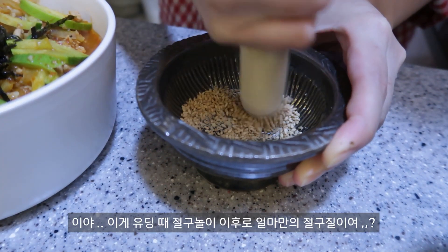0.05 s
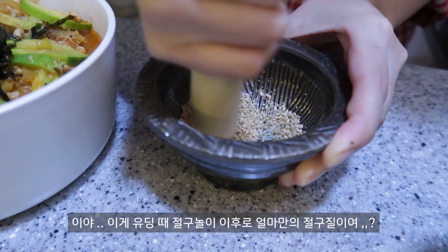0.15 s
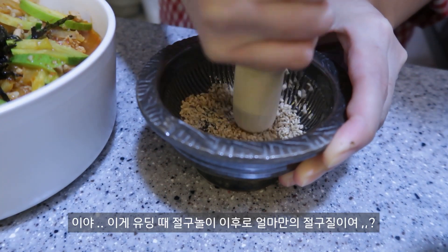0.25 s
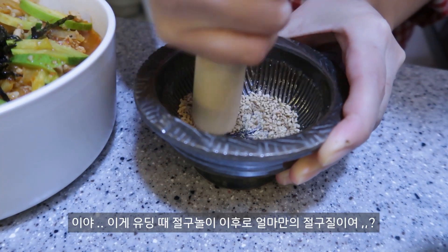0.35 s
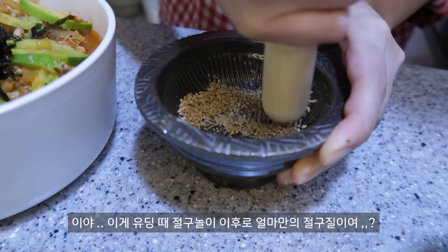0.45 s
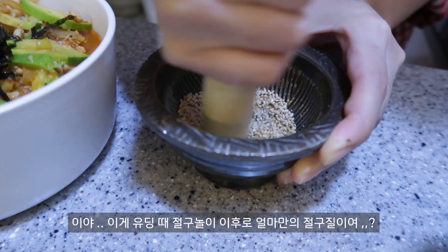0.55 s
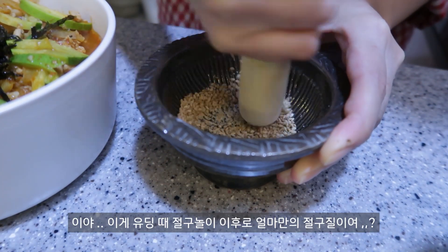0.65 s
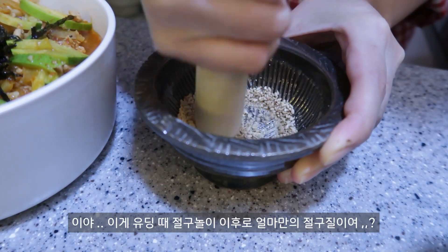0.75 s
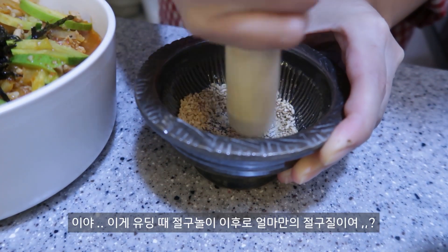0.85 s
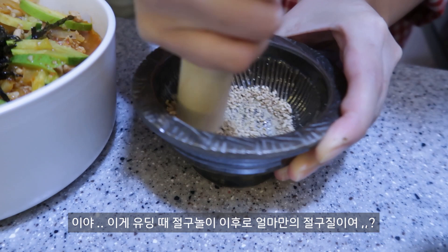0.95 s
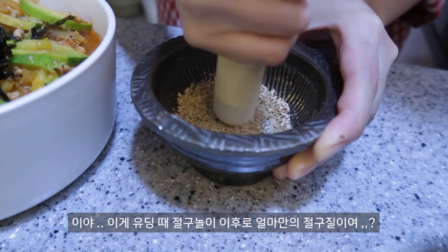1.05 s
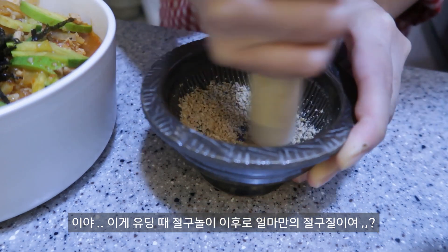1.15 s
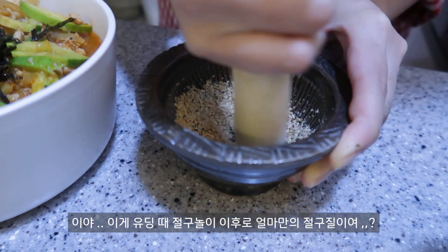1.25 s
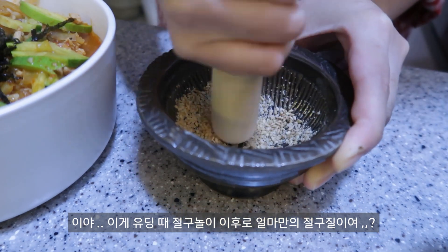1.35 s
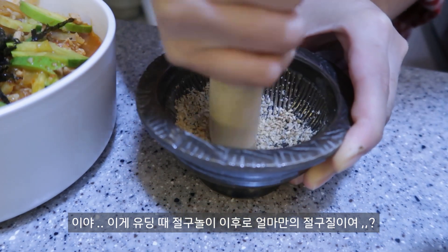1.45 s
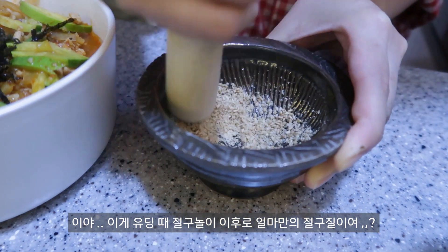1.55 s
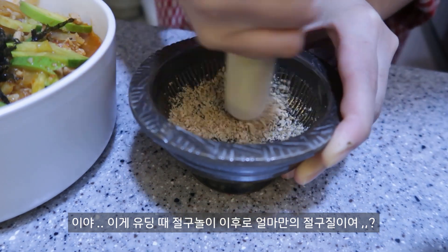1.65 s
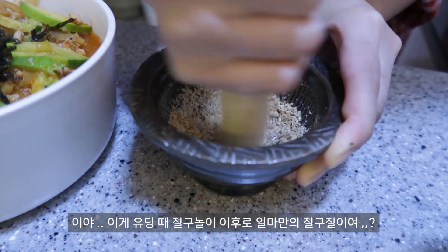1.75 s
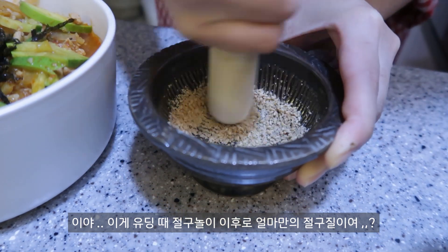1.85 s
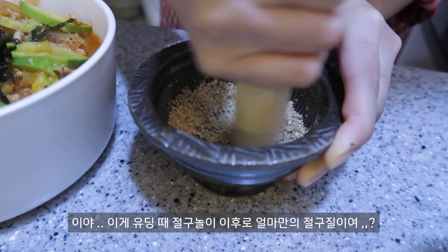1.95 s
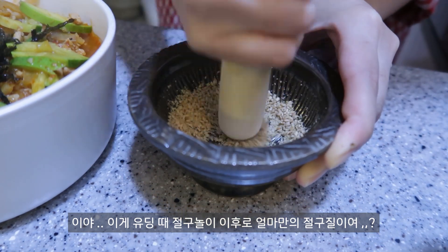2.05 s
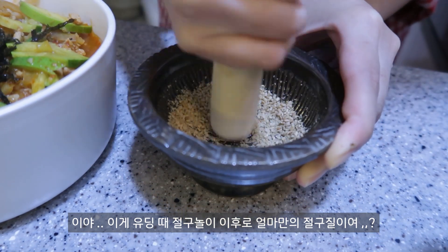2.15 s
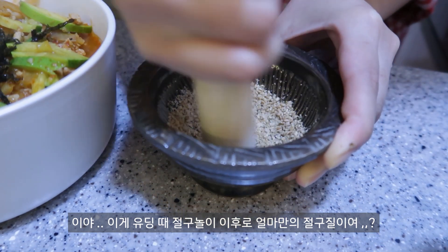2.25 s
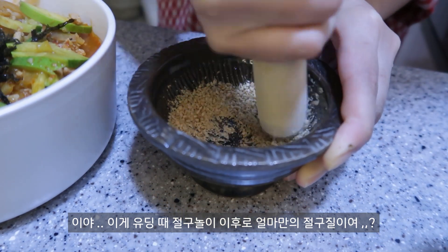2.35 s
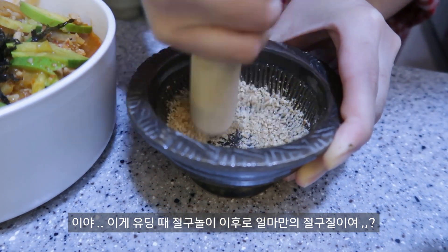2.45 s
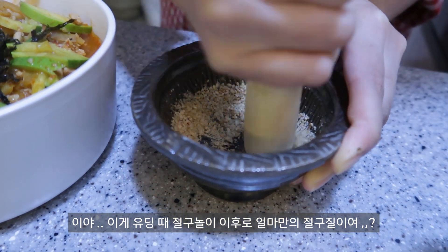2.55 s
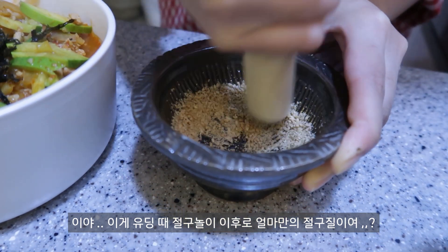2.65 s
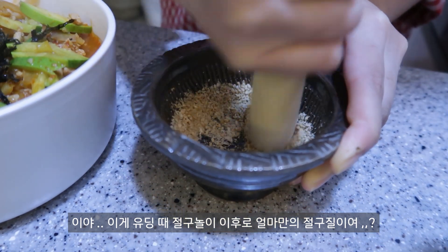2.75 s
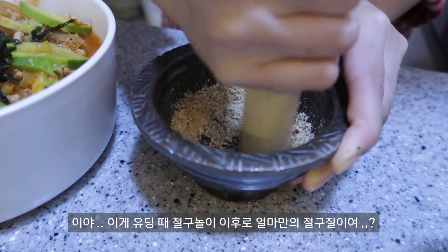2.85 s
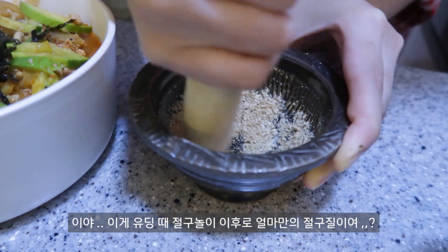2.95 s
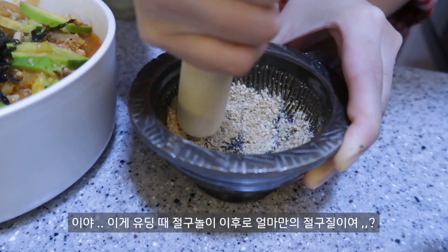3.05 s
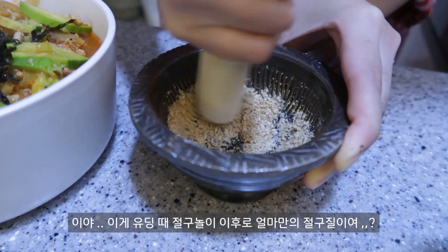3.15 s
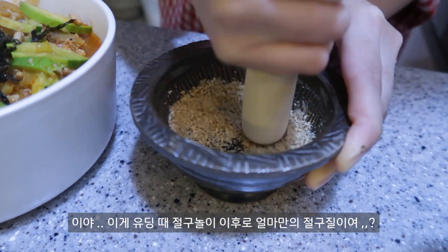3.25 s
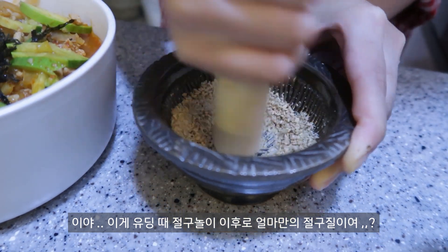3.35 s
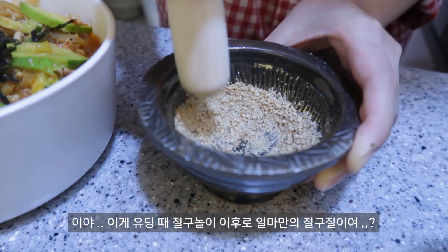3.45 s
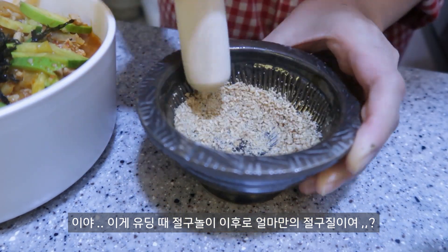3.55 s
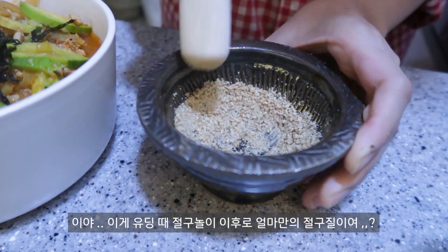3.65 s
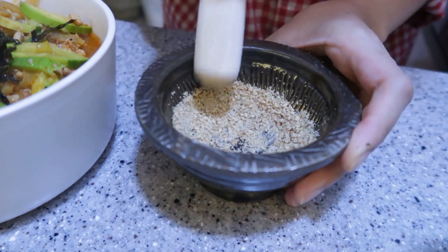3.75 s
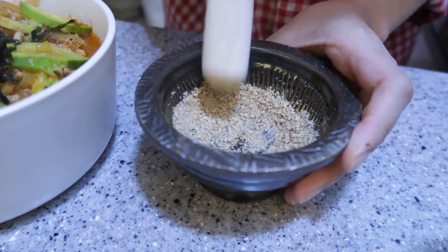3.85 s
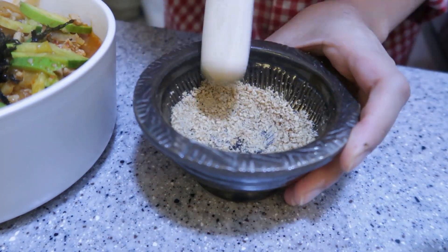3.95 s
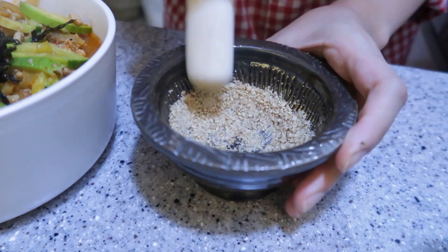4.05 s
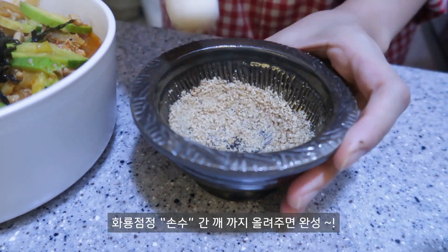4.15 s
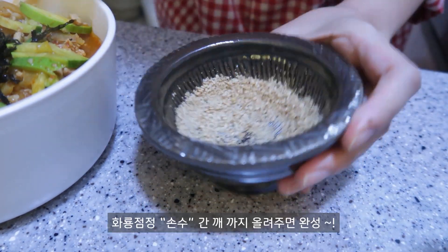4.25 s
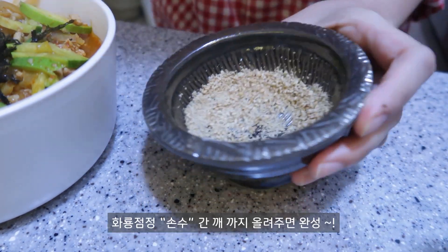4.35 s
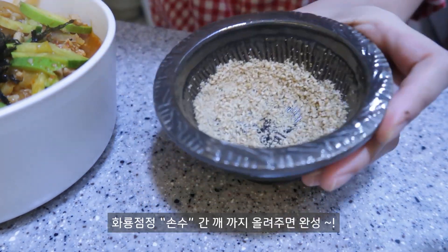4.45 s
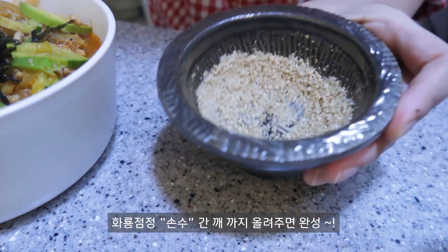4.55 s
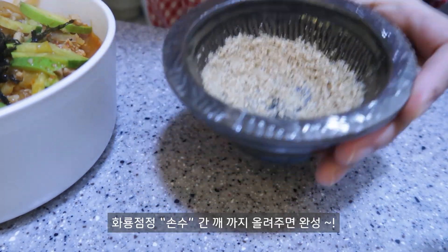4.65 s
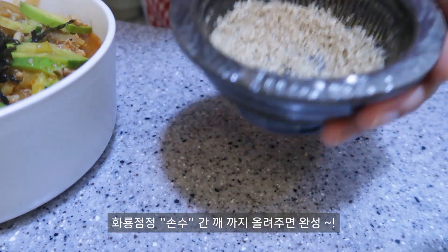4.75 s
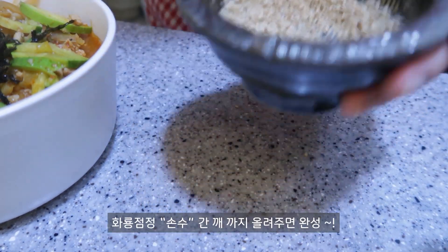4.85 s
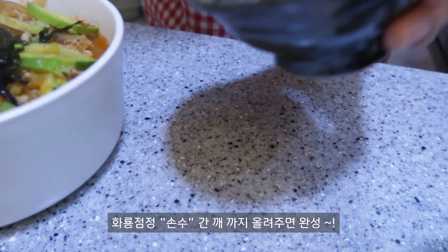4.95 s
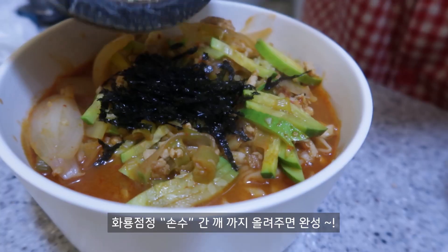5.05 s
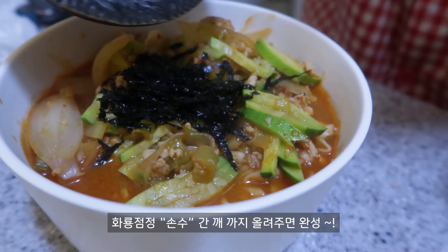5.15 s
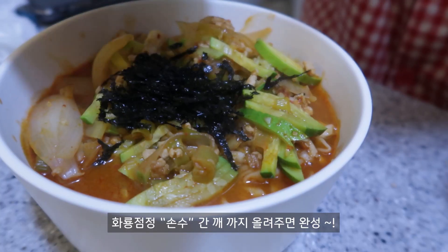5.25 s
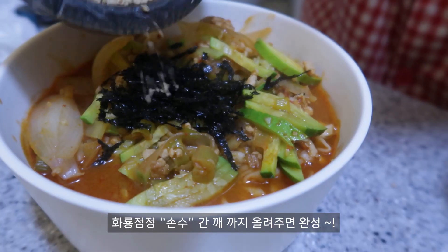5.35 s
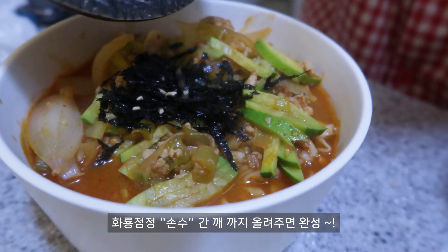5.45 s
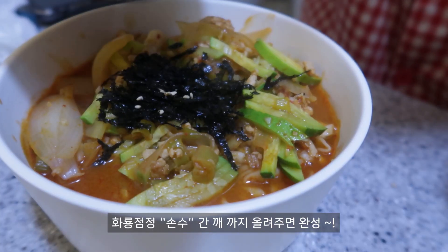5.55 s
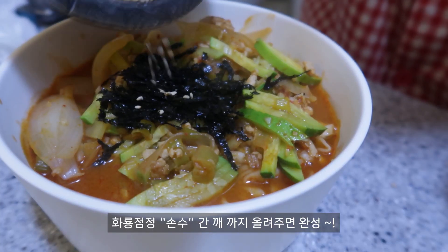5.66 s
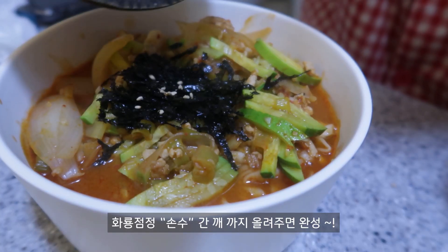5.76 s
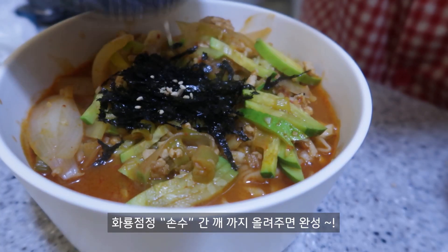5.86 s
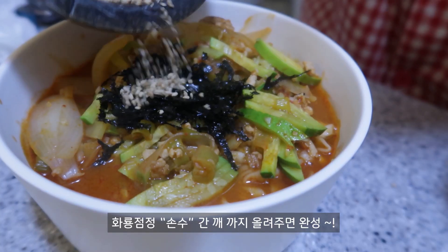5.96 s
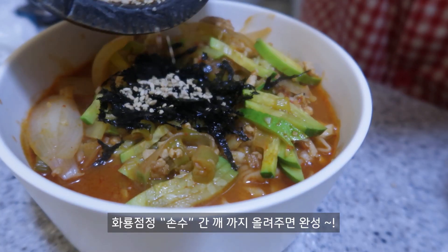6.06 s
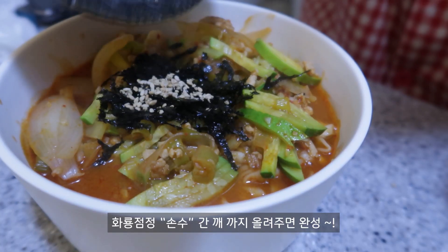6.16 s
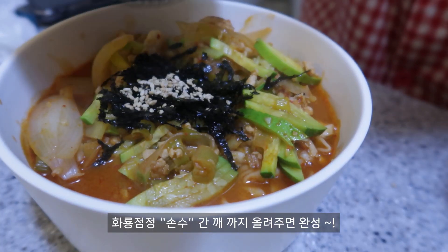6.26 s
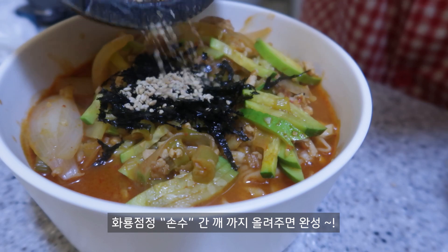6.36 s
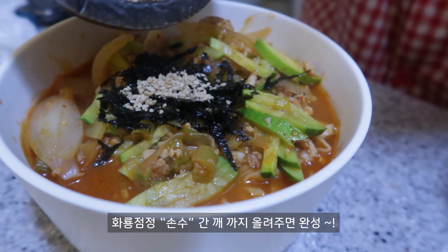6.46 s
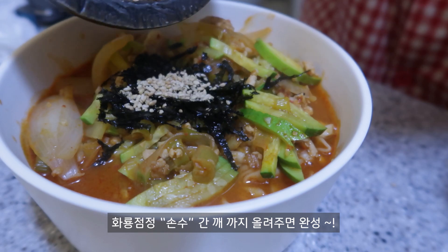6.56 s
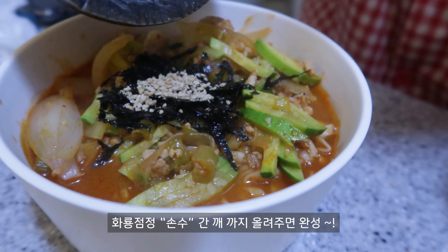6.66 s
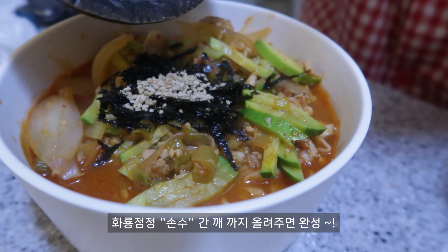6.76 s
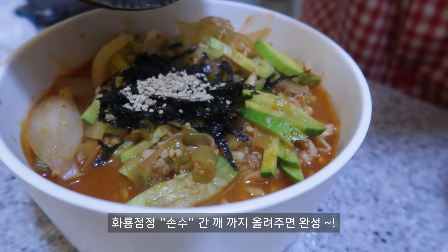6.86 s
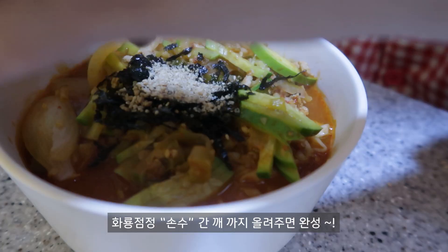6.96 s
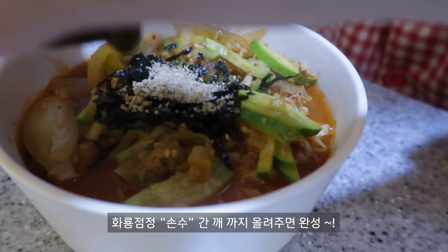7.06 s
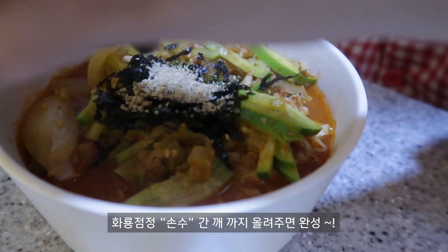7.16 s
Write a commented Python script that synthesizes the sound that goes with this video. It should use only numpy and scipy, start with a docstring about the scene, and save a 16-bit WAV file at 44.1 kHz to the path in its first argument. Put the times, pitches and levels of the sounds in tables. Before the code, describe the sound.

A wooden pestle grinds sesame seeds in a ribbed ceramic mortar, scratchy and crunching, then taps the rim four times before soft pouring and a clink.

```python
"""A quiet kitchen, a stone counter close to the camera's two microphones: a wooden pestle grinds seeds in a ribbed
ceramic mortar. It scrapes, knocks on the ribs and cracks seeds, then taps the rim four times. The mortar is lifted
and shaken over a bowl, and clinks. The kitchen hums behind, louder in the second half; the camera ticks faintly.
Contacts are noise bursts and grains through resonances, rings are decaying sines, the kitchen is noise and tones."""
import sys
import numpy as np
from scipy import signal
from scipy.fft import rfft, irfft, next_fast_len
from scipy.io import wavfile
from scipy.ndimage import map_coordinates

SR = 44100
rng = np.random.default_rng(int(sys.argv[2]) if len(sys.argv) > 2 else 0)


def output_pcm(signal):
    """Save a mono or channel-first signal as 16-bit PCM at the path in sys.argv[1].

    Samples are clipped to [-1, 1] before scaling.
    """
    pcm = np.clip(np.atleast_2d(signal).T, -1, 1) * 32767
    wavfile.write(sys.argv[1], SR, np.round(pcm).astype(np.int16))


N = 318401
TIME = np.arange(N) / SR  # s
LATER_S = 2.78  # from here on the grinding sounds duller
LATER = TIME > LATER_S


def amp(db):
    """Gain of a level in dB."""
    return 10 ** (np.asarray(db) / 20)


def unit(x):
    """x scaled to rms 1."""
    return x / np.sqrt(np.mean(x ** 2) + 1e-20)


def along(points, hz):
    """(Hz, value) points read on a log frequency axis."""
    f, v = np.transpose(points)
    return np.interp(np.log(hz + 1), np.log(f + 1), v)


def curves(rows, outside=None):
    """One value per sample for each column after the time."""
    s, *columns = np.transpose(rows)
    return [np.interp(TIME, s, column, outside, outside) for column in columns]


def wobble(rate):
    """A smooth random curve, rate knots a second."""
    knots = rng.standard_normal(int(N * rate / SR) + 4)
    return map_coordinates(knots, [np.arange(N) * rate / SR])


def filtered(x, response):
    """x times a complex response of frequency, scaled so that white noise keeps its level."""
    m = next_fast_len(N + SR // 2)
    h = response(np.fft.rfftfreq(m, 1 / SR))
    h = unit(np.abs(h)) * np.exp(1j * np.angle(h))
    return irfft(rfft(x, m) * h, m)[..., :N]


def resonant(x, modes, steep_hz):
    """x rings in a body of (Hz, width Hz, dB) modes; above steep_hz the body falls off faster."""
    def body(f):
        total = 0
        for k, (center, width, db) in enumerate(modes):
            mode = 1j * f * width / (center * center - f * f + 1j * f * width)
            total = total + (-1) ** k * amp(db) * mode  # neighbours alternate in sign
        return total / (1 + 1j * f / steep_hz) ** 2
    return filtered(x, body)


def twice(x, modes, steep_hz):
    """A heavy body passes little outside its resonance; rms 1."""
    return unit(resonant(resonant(x, modes, steep_hz), modes, steep_hz))


def coloured(x, spectrum):
    """x shaped by a spectrum of (Hz, dB) points."""
    return filtered(x, lambda hz: amp(along(spectrum, hz)))


BIGGEST = 2  # no grain outgrows the mean by more than this many spreads


def grains(rate, spread_db, smooth):
    """Scattered tiny impacts (rate per second) of uneven size on a smooth rub, rms 1."""
    size = amp(spread_db * np.minimum(rng.exponential(size=N), BIGGEST))
    impacts = (rng.random(N) < rate / SR) * size * rng.standard_normal(N)
    return unit(unit(impacts) + smooth * rng.standard_normal(N))


def bursts(times, db, length, blow):
    """Pushes that start at once: one sharp blow ahead of noise that falls 60 dB in its length."""
    out, t = np.zeros(N + SR), np.arange(SR // 10) / SR
    for s, level, t60, first in np.broadcast(times, db, length, blow):
        fade = amp(-60 * t / max(t60, .001))
        noise = fade * rng.standard_normal(len(t))
        noise *= np.linalg.norm(fade) / np.linalg.norm(noise)
        noise[0] = first
        out[round(s * SR):][:len(t)] += amp(level) * noise
    return out[:N]


def sides(db):
    """Gains for a left-right difference."""
    return amp(np.array([db, -db]) / 2)


def ringing(times, db, pan, modes, scatter_db=1.0, flutter_db=0, drift=0):
    """Each blow rings (Hz, dB, t60 s) modes at new strengths, fluttering, a little out of step between microphones."""
    out, t = np.zeros((2, N + SR)), np.arange(SR // 2) / SR
    onset = 1 - np.exp(-(t / 0.0005) ** 2)

    def slow():
        return np.interp(t, np.arange(40) / 70, rng.standard_normal(40))

    for s, level, side in zip(times, db, pan):
        lead = (12.0 + 3.2 * side) * np.array([[1e-6], [-1e-6]])  # s
        ring = 0
        for hz, mode_db, t60 in modes:
            strength = level + mode_db + rng.normal(0, abs(scatter_db))
            gain = amp(strength + flutter_db * slow() - 60 * t / t60)
            phase = 2 * np.pi * hz * (t + lead) + drift * slow() * np.minimum(t / .01, 1)
            ring = ring + gain * np.sin(phase)
        out[:, round(s * SR):][:, :len(t)] += sides(side)[:, None] * ring * onset
    return out[:, :N]


def ports(x, pan, lead):
    """The two microphones hear a near source at slightly different level and phase."""
    m = next_fast_len(N + SR // 2)
    hz, half = np.fft.rfftfreq(m, 1 / SR), np.array([[.5], [-.5]])
    turn = np.exp(1j * half * along(lead, hz))
    return irfft(rfft(x, m) * amp(half * along(pan, hz)) * turn, m)[:, :N]


# pestle strokes, one list each, before layer offsets:
# (time [s], scrape [dB], push on the counter [dB], crunch of seeds [dB])
STROKES = [
    [(0.0, -29, -32, -42), (0.01, -39.5, -39, -32.5), (0.04, -51, -47, -75), (0.06, -65, -59.5, -74.5),
     (0.07, -67, -75, -74.5), (0.082, -65, -53.5, -76), (0.085, -49, -60, -72)],
    [(0.105, -44, -42, -55.5), (0.143, -34, -41.5, -47), (0.197, -29, -43.5, -48.5),
     (0.221, -33, -46.5, -50), (0.247, -38.5, -44.5, -45), (0.475, -33.5, -37.5, -52.5),
     (0.51, -55, -66, -64)],
    [(0.52, -50, -50, -53), (0.548, -36, -52, -41.5), (0.73, -28.5, -32, -41), (0.788, -29, -43, -52.5),
     (0.868, -31.5, -35, -38.5), (0.874, -59, -43, -71), (0.94, -68, -60.5, -68)],
    [(0.965, -41, -62, -58.5), (0.975, -35, -53, -47), (1.115, -41, -37, -45), (1.125, -57, -50, -60),
     (1.137, -19.5, -33.5, -48), (1.153, -51, -57, -65.5), (1.16, -62, -54.5, -72)],
    [(1.17, -67, -60, -76.5), (1.182, -48, -75, -54.5), (1.216, -37, -34.5, -42), (1.222, -32.5, -36, -44),
     (1.252, -42.5, -34, -49), (1.312, -64, -54, -72), (1.33, -45, -66, -56)],
    [(1.345, -39, -63, -41.5), (1.353, -41, -64, -59), (1.357, -38, -67, -46.5),
     (1.415, -47.5, -38.5, -50.5), (1.429, -55, -42, -56), (1.469, -68, -60, -65), (1.48, -49, -63, -65)],
    [(1.5, -38, -50, -54), (1.512, -34, -50, -49), (1.518, -46, -58, -43), (1.546, -35, -34, -45),
     (1.566, -43, -40.5, -49), (1.58, -69, -49, -64), (1.622, -56, -52, -69)],
    [(1.66, -29.5, -51, -50), (1.69, -40, -44, -37.5), (1.718, -26.5, -40, -45), (1.836, -39, -63, -47),
     (1.85, -35, -52, -51.5), (1.912, -28.5, -33.5, -42), (1.97, -29, -44.5, -46.5)],
    [(1.98, -37, -37.5, -37.5), (1.99, -25, -41, -45), (2.016, -41, -60, -49), (2.046, -17, -57.5, -40.5),
     (2.062, -32, -37.5, -45.5), (2.208, -35, -40.5, -51), (2.31, -69, -45.5, -65)],
    [(2.33, -35.5, -49, -46.5), (2.508, -34, -34.5, -39.5), (2.558, -25.5, -42, -52.5),
     (2.614, -43, -53.5, -48.5), (2.634, -18, -44, -43.5), (2.67, -28, -38, -41), (2.725, -70, -56.5, -84)],
    [(2.745, -40, -43, -56), (2.783, -35, -54, -70), (2.833, -41, -53.5, -49.5), (2.849, -29, -52.5, -63.5),
     (2.925, -37.5, -50.5, -69), (2.961, -23, -34, -64.5), (3.05, -43, -41.5, -66)],
    [(3.06, -36, -35, -66.5), (3.094, -37, -49, -65), (3.348, -32, -33, -62), (3.378, -40, -48, -65.5),
     (3.406, -36, -28.5, -66), (3.484, -63.5, -54, -80.5), (3.55, -45, -48, -75.5)],
]


def strokes():
    """Scrape, push and crunch levels; they run on between strokes and are silent after the last one."""
    return curves(sorted(row for stroke in STROKES for row in stroke), outside=-150)


JOLT_TOP_DB = 3.5  # upper limit of the jolts' gain


def jolts():
    """The pestle stutters: a fast and a slower random wobble in level."""
    return amp(np.minimum(3.5 * wobble(170) + 2.5 * wobble(45), JOLT_TOP_DB))


# pestle against the ribs, before layer offsets:
# (time [s], level [dB], wood against it [dB], grit against it [dB], length [s])
KNOCKS = [(0.092, -10, -48, -10.5, 0.065), (0.149, -21, -8, -18, 0.037), (0.166, -10.5, -19, -19, 0.022),
          (0.189, -6.5, -19, -17, 0.065), (0.272, -25, -14, -6, 0.045), (0.294, -16, -12, -19.5, 0.049),
          (0.345, -7, -23, -24.5, 0.046), (0.364, -11.5, -12, -18, 0.031), (0.433, -20, -12, -4, 0.081),
          (0.455, -16.5, -12.5, -6.5, 0.034), (0.473, -17.5, -21, -31, 0.06), (0.609, -9.5, -9, -25, 0.023),
          (0.628, -17, -14.5, -25, 0.052), (0.651, -20.5, -12.5, -12.5, 0.064),
          (0.6787, -13, -11, -17, 0.022), (0.698, -16, -7.5, -16.5, 0.036),
          (0.708, -7, -18.5, -16.5, 0.025), (0.71, -14, -19, -23.5, 0.15), (0.744, -21.5, -13, -31, 0.03),
          (0.764, -14.5, -7, -16, 0.047), (0.781, -17.5, -6, -5.5, 0.055), (0.801, -16.5, -12, -10, 0.11),
          (0.833, -14, -13, -16, 0.034), (0.854, -16, -15, -19.5, 0.035), (0.951, -8, -52.5, -20.5, 0.048),
          (1.068, -24.5, 1.5, -19, 0.041), (1.09, -29.5, 1.5, -13, 0.055), (1.134, -16.5, -19.5, -18, 0.04),
          (1.1374, -18, -24, -20, 0.03), (1.184, -30, -19, -8, 0.029), (1.205, -17, -11, -20.5, 0.035),
          (1.221, -8.5, -23.5, -28.5, 0.027), (1.229, -24, -21, -14, 0.02),
          (1.341, -20.5, -24, -14.5, 0.045), (1.488, -7, -39, -21, 0.032), (1.632, -12, -15.5, -8, 0.039),
          (1.644, -9, -18.5, -17.5, 0.092), (1.711, -21, -16, -22.5, 0.039), (1.735, -20, -18, -18, 0.035),
          (1.763, -4.5, -20.5, -24.5, 0.051), (1.8018, -17, -14, -20, 0.03),
          (1.824, -7, -21.5, -21.5, 0.068), (1.866, -21, -18, -8.5, 0.034),
          (1.898, -17.5, -8, -12.5, 0.049), (1.941, -31.5, -20, -25, 0.067), (1.986, -4, -30, -30, 0.031),
          (2.032, -14.5, -9.5, -17.5, 0.029), (2.044, -9.5, -15, -11, 0.042),
          (2.089, -11.5, -16.5, -22.5, 0.056), (2.135, -27, -13, -17, 0.053),
          (2.147, -20.5, -15, -16, 0.035), (2.175, -18, -16, -11.5, 0.043),
          (2.206, -23.5, -6, -17.5, 0.051), (2.327, -21, -9.5, -20, 0.034), (2.349, -24.5, -17, -29, 0.049),
          (2.376, -32, -16.5, -17, 0.03), (2.389, -29, -17.5, -18, 0.034), (2.408, -17, -15, -20, 0.031),
          (2.441, -23, -14.5, -1, 0.041), (2.484, -10.5, -14.5, -18, 0.051),
          (2.494, -17, -18, -25.5, 0.034), (2.527, -16, -18, -23.5, 0.04), (2.575, -18.5, -4.5, -16, 0.043),
          (2.625, -13.5, -16, -27, 0.057), (2.652, -15.5, -16, -21.5, 0.03), (2.662, -20, -33, -17, 0.03),
          (2.513, -14, -9, -22.5, 0.095), (2.536, -12.5, -26.5, -17.5, 0.055),
          (2.55, -7, -18, -30.5, 0.057), (2.634, -3.5, -22.5, -29, 0.031),
          (2.676, -15, -29.5, -32.5, 0.043), (2.734, -19, -22, -7, 0.071), (2.789, -29, -12, -43, 0.046),
          (2.851, -1.5, -12, -57, 0.038), (2.884, -19, -15.5, -36, 0.069), (2.937, -15.5, -13, -41, 0.037),
          (2.962, -5.5, -19, -44, 0.052), (3.098, -26, -17, -35, 0.04), (3.136, -24, -22, -25, 0.04),
          (3.18, -16, -15.5, -30, 0.059), (3.222, -22.5, -32.5, -18, 0.063), (3.263, -9, -11, -40.5, 0.099),
          (3.293, -8.5, -8, -52.5, 0.045), (3.341, -10, 1.5, -42.5, 0.031), (3.382, -17, -3.5, -27, 0.08),
          (3.403, -14.5, -6, -44.5, 0.056), (3.555, -27.5, -8.5, -44, 0.076)]
EDGE_PER_GRIT, EDGE_KNOCK_DB = 0.37, -5  # gritty knocks are also bright
EDGE_PER_WOOD = -0.24  # hard knocks with little wood are the brightest
LATER_BLOW = 4.4  # the later knocks start with a cleaner blow


def knocks():
    """Hard, bright contacts are one clean blow; returns a maker of knock layers and the levels of each part."""
    s, db, wood_db, grit_db, length = np.transpose(KNOCKS)
    edge_db = EDGE_PER_GRIT * grit_db + EDGE_PER_WOOD * wood_db + EDGE_KNOCK_DB
    sharp = 3.74 + LATER_BLOW * (s > LATER_S) + amp(2 * edge_db + 23.5)
    db = db - 10 * np.log10(1 + sharp ** 2 / 30)  # a sharper blow gets less level

    def layer(offset_db, share=1):
        return bursts(s, db + offset_db, share * length, sharp)

    return layer, wood_db, grit_db, edge_db


# the counter thuds under the hand's weight: (time [s], level [dB])
WEIGHT = [(0.0, -60.5), (0.63, -78), (0.72, -55.5), (1.03, -84), (1.08, -56), (1.58, -78), (1.73, -48),
          (1.81, -75), (2.14, -57.5), (2.25, -69.5), (3.29, -34.5), (3.6, -60)]
# counter resonances: (center [Hz], width [Hz], relative level [dB])
THUD = [(77.7, 31, 0)]
DRUM = [(167.1, 59, 2)]
DRUM_DB, LATER_DRUM_DB = 1.5, -4.5


def counter(push):
    """The stone counter's heavy low resonances, driven by the hand's weight and push."""
    thud = twice(rng.standard_normal(N), THUD, steep_hz=298)
    drum = twice(rng.standard_normal(N), DRUM, steep_hz=610)
    return amp(curves(WEIGHT, outside=-150)[0]) * thud + amp(push + DRUM_DB + LATER_DRUM_DB * LATER) * drum


def blend(scrape, other, share, offset_db):
    """A rub level that follows the scrape and, by share, a second control."""
    return (1 - share) * scrape + share * other + offset_db


# pestle, bowl and the later, duller body: (center [Hz], width [Hz], relative level [dB])
WOOD = [(295, 46, -8.5), (341.8, 16, 1.5), (420, 51, 2), (548.5, 12, -2.5)]
BOWL = [(521, 96, -6), (674, 40, -3), (880, 131, -1), (1139, 89, 1), (1342, 39, 4.5), (1453, 78, 3),
        (1740, 210, -22.5)]
LATER_BODY = [(194, 45, -5.5), (327, 30, -7), (460, 59, -2), (579, 30, 0), (684, 60, -3), (913, 160, -2.5),
              (1005, 140, -4), (1240, 83, -4.5), (1430, 41, -12)]
BOWL_RUB_DB, LATER_RUB_DB, LATER_KNOCK_DB = -2, -1, -6.5


def mortar_body(scrape, push, rub, soft, knock, wood_db):
    """Rub and knocks wake the wood and the bowl, and later one duller set of resonances."""
    wood = amp(blend(scrape, push, share=0.27, offset_db=-4))
    bowl = amp(scrape + BOWL_RUB_DB)
    later = amp(scrape + LATER_RUB_DB)
    body = resonant(~LATER * (wood * rub + knock(wood_db)), WOOD, steep_hz=890)
    body += resonant(~LATER * (bowl * rub + knock(-10.5)), BOWL, steep_hz=2530)
    return body + resonant(LATER * (later * soft + knock(LATER_KNOCK_DB)), LATER_BODY, steep_hz=2500)


# bright ceramic edge, glaze and grit: (center [Hz], width [Hz], relative level [dB])
EDGE = [(1475, 220, 0), (1866, 218, 4), (2187, 130, 2), (2479, 140, 2.5), (2860, 150, -7),
        (3353, 240, -9.5), (3980, 720, -11)]
GLAZE = [(2960, 560, -3.5), (3245, 160, 2), (3605, 600, -6.5)]
GRIT = [(4520, 750, 0), (5430, 790, 1), (6310, 900, 0.45)]
# the glaze's hiss in the later grinding: (time [s], level [dB])
LATER_GLAZE = [(2.78, -54), (2.858, -42.5), (2.87, -62), (2.884, -43), (2.902, -51), (2.91, -65),
               (2.964, -34), (2.988, -49.5), (3.19, -46), (3.21, -67), (3.22, -34), (3.246, -55),
               (3.26, -43.5), (3.372, -57), (3.382, -42), (3.46, -75)]
LATER_EDGE_DB, GLAZE_RUB_DB = -4, -15.5
GLAZE_KNOCK_DB = -4  # bright knocks also wake the glaze


def mortar_edge(scrape, seeds, rub, soft, knock, edge_db):
    """Rub and knocks wake the ceramic's bright edge and hissing glaze."""
    edge = amp(blend(scrape, seeds, share=0.24, offset_db=-2.3) + LATER_EDGE_DB * LATER)
    glaze = amp(np.where(LATER, curves(LATER_GLAZE, outside=-150)[0], scrape + GLAZE_RUB_DB))
    bright = resonant(edge * np.where(LATER, soft, rub) + knock(edge_db - 0.5, share=0.72), EDGE, steep_hz=5990)
    bright += glaze * twice(rub, GLAZE, steep_hz=5740)
    glaze_knock = knock(2.0 * edge_db + GLAZE_KNOCK_DB, share=0.36)
    return bright + resonant(glaze_knock, GLAZE + GRIT[:1], steep_hz=7140)


# ring of bare ceramic: (frequency [Hz], relative level [dB], t60 [s])
CLACK = [(852, -9.5, 0.05), (1374, 0, 0.093), (2226, -9, .02), (2460, 4, .022), (2900, -8, .02),
         (3330, -2, 0.022), (3920, -10, 0.02)]
CLACK_S, CLACK_DB, CLACK_STOP_S = 1.135, -17.5, 1.153


def clack():
    """One blow on bare ceramic rings and is cut off abruptly."""
    ring = ringing([CLACK_S], [CLACK_DB], [0], CLACK).mean(axis=0)
    cutoff = amp(-15 * np.maximum(TIME - CLACK_STOP_S, 0) / .002)
    return ring * amp(2.3 * wobble(500)) * cutoff


# high fizz of seeds: (frequency [Hz], relative density [dB per Hz])
FIZZ = [(4500, -23.5), (7000, -2.5), (9000, -1), (11000, 1), (13000, -2), (15000, -3), (15800, -10.5),
        (16500, -29)]
GRIT_RUB_DB, LATER_FIZZ_DB = -0.5, 16


def seed_crunch(scrape, seeds, jolt, knock, grit_db):
    """Crushed seeds: gritty grains jolted by the pestle, and a fizz above them."""
    crunch = amp(seeds + GRIT_RUB_DB) * unit(jolt * grains(1500, spread_db=5, smooth=0.55))
    crunch += knock(grit_db - 4, share=0.67)
    common = grains(900, spread_db=3, smooth=.6)
    own = np.array([grains(900, spread_db=3, smooth=.6) for _ in "LR"])
    fizz = amp(blend(scrape, seeds, share=1, offset_db=-13) + LATER_FIZZ_DB * LATER)
    high = fizz * unit(jolt * (common + 0.5 * own))  # seeds lie across the bowl: the sides differ
    return resonant(crunch, GRIT, steep_hz=8900) + coloured(high, FIZZ)


# seeds bursting, before layer offsets: (time [s], level [dB], lower crunch against it [dB])
CRACKS = [(0.091, -25, 5), (0.112, -34.5, 0), (0.1354, -28, 0), (0.167, -31, -2), (0.1974, -31.5, 4),
          (0.2254, -43, 0), (0.243, -26, 3), (0.274, -27.5, 4), (0.311, -25, 1), (0.3656, -47, 0),
          (0.405, -32.5, 3), (0.413, -27.5, 8), (0.4364, -24, 3), (0.4534, -35, 0), (0.5152, -41, 0),
          (0.5271, -29.5, 6), (0.5402, -27, -2), (0.5514, -40, 2), (0.568, -30, 4), (0.622, -30.5, 0),
          (0.6624, -28, -2), (0.6789, -31, 0), (0.6974, -40, 0), (0.713, -25, 0), (0.7622, -37, 0),
          (0.7816, -40.5, 0), (0.8031, -33.5, 0), (0.833, -31.5, 0), (0.8425, -29, -3), (0.863, -29.5, 0),
          (0.9517, -30.5, -4), (0.9792, -33, 0), (0.9916, -31.5, 0), (1.069, -33, 0), (1.0893, -38.5, -2),
          (1.134, -33, 0), (1.1787, -44, 0), (1.186, -25, 0), (1.205, -28.5, 0), (1.2216, -28.5, 0),
          (1.255, -37, 0), (1.3414, -29.5, -5), (1.4875, -41, 0), (1.5155, -27.5, -7), (1.6312, -42, 0),
          (1.6806, -31, 2), (1.697, -18.5, 5.5), (1.737, -24.5, -3), (1.7489, -22.5, -4), (1.769, -25, -2),
          (1.8018, -44, 0), (1.8248, -42, 0), (1.8911, -31.5, 0), (1.918, -28, 6), (1.9594, -33.5, 2),
          (2.0223, -40, 0), (2.0462, -33, 6), (2.0757, -28, 2), (2.0894, -36, 0), (2.1123, -22.5, 4),
          (2.1304, -45, -2), (2.147, -27, 0), (2.1584, -39.5, 0), (2.1744, -45, 0), (2.3231, -25, 3),
          (2.3685, -41, 0), (2.4069, -33, 0), (2.4414, -40, 0), (2.4523, -27.5, 9), (2.4833, -34, 0),
          (2.5112, -23.5, 0), (2.5454, -45, 0), (2.572, -28.5, -3), (2.6244, -33, 0), (2.6363, -26, -4),
          (2.6594, -42, 0), (2.7333, -40.5, -5), (2.822, -26.5, 0), (3.0165, -31.5, -4),
          (3.2211, -27.5, -2.5), (3.3024, -41.5, 4), (3.338, -26, -2.5), (3.3835, -34.5, 0)]
CRACK_SCATTER_DB = 7  # left or right in the bowl


def seed_cracks():
    """Seeds burst with a short crunch; the husk rattles briefly, in part differently at each microphone."""
    s, db, lower_db = np.transpose(CRACKS)
    pan = CRACK_SCATTER_DB * rng.standard_normal(len(s))
    husk = bursts(s, db - 8.5, 0.018, blow=0.51)
    own = np.array([bursts(s, db - 15.0 + side * pan / 2, 0.013, blow=0.56) for side in (1, -1)])
    lower = bursts(s, db + lower_db - 9.5, 0.0095, blow=2.5)
    return resonant(lower, GRIT, steep_hz=8900) + coloured(husk + own, FIZZ)


# grinding at the two microphones: (frequency [Hz], left-right [dB])
GRIND_PAN = [(60, 0.0), (180, 0.0), (550, 0.0), (1650, -0.5), (4970, -0.5), (15000, -0.5)]
# (frequency [Hz], left leads by [rad])
GRIND_LEAD = [(200, -0.25), (1000, 0.18), (4000, -0.28), (9000, -0.66)]
LATER_SMOOTH = 0.33  # smooth noise mixed into the later, steadier rub


def grinding():
    """The pestle stutters over the ribs; one jolt shapes the rub on the mortar and the crunch of seeds."""
    scrape, push, seeds = strokes()
    jolt = jolts()
    knock, wood_db, grit_db, edge_db = knocks()
    rub = unit(jolt * grains(900, spread_db=5, smooth=.3))
    soft = unit(rub + LATER_SMOOTH * rng.standard_normal(N))
    mortar = mortar_body(scrape, push, rub, soft, knock, wood_db)
    mortar += mortar_edge(scrape, seeds, rub, soft, knock, edge_db) + clack()
    return counter(push) + mortar + seed_crunch(scrape, seeds, jolt, knock, grit_db) + seed_cracks()


# likeness of the two microphones: (frequency [Hz], correlation)
ALIKE = [(60, 1.0), (180, 0.32), (550, 0.4), (1650, 0.13), (4970, 0.038), (15000, 0.06)]


def wide(spectrum):
    """Stereo noise of rms 1 whose sides grow apart with frequency."""
    m = next_fast_len(N)
    hz = np.fft.rfftfreq(m, 1 / SR)
    turn = np.arccos(np.clip(along(ALIKE, hz), -1, 1)) / 2
    noise = rfft(rng.standard_normal((2, N)), m) * amp(along(spectrum, hz))
    mid, side = irfft(noise * [np.cos(turn), np.sin(turn)], m)[:, :N]
    return unit(np.array([mid + side, mid - side]))


def gliding(rows):
    """A sine that follows (s, Hz, dB) rows, silent outside them."""
    hz, db = curves(rows)[0], curves(rows, outside=-150)[1]
    return amp(db) * np.sin(2 * np.pi * np.cumsum(hz) / SR)


# background levels before layer offsets, mostly quieter from about 4.2 s, louder again from about 5.1 s:
# (time [s], rumble [dB], drone [dB], wash [dB], hiss [dB], camera ticks [dB])
KITCHEN = [(4.14, -75.5, -51, -64, -87.5, -85.5), (4.31, -68, -56, -71.5, -98, -88),
           (4.62, -68, -58.5, -69, -92, -86), (4.95, -60, -57, -69.5, -93, -78),
           (5.15, -56, -47, -58, -78, -67.5), (7.0, -53, -49, -59, -77.5, -69)]
# noise colours: (frequency [Hz], relative density [dB per Hz])
WASH = [(300, -1.5), (450, 1.5), (600, -1.5), (800, -3.5), (1350, -8.5), (2500, -12), (3500, -14),
        (4500, -17), (6000, -34), (8000, -54.5)]
HISS = [(2940, -29), (5000, -3), (5530, -4), (13500, -16.5), (15500, -33), (15800, -48.5), (16500, -51)]
# resonances of the drone: (center [Hz], width [Hz], relative level [dB])
DRONE = [(142, 29, 2), (272, 56, 1), (380, 88, -5.5)]
# faint steady pitches: (frequency [Hz], level at the loudest wash, before a wobble [dB])
WHINE = [(272, -60), (1303, -70.5), (2821, -73.5)]
# a brief hum: (time [s], frequency [Hz], level [dB])
HUM = [(4.36, 202.6, -53.5), (4.5, 217, -51.5), (4.6, 209.8, -52.5), (4.74, 211, -69.5)]
# a low wavering tone: (time [s], frequency [Hz], rms level before a wobble [dB])
THROB = [(4.2, 63.94, -60), (4.29, 63.6, -59.5), (4.6, 70.2, -71), (4.79, 61.44, -57), (5.02, 60.56, -68.5),
         (5.11, 73.5, -64), (5.14, 74.2, -53.5), (5.41, 74, -43), (5.5, 65.6, -54), (5.59, 66, -54),
         (5.65, 75.1, -62), (5.7, 74.84, -50.5), (6.38, 74.6, -54), (6.53, 67.5, -55), (6.61, 74.1, -48.5),
         (6.98, 72.9, -46.5), (7.05, 73.2, -69), (7.09, 73.7, -43), (7.14, 71.2, -69), (7.22, 66.4, -63)]


def kitchen():
    """Rumble, drone, wash and hiss of the room, faint tones that follow the wash, a low throb and a brief hum."""
    rumble, drone, wash, hiss, _ = curves(KITCHEN)
    air = amp(wash + 5.5 + 0.66 * wobble(2.4)) * wide(WASH) + amp(hiss + 11.0) * wide(HISS)
    low = amp(rumble) * twice(rng.standard_normal(N), [(66.8, 47, 0)], steep_hz=200)
    low += amp(drone - 4.0) * resonant(rng.standard_normal(N), DRONE, steep_hz=700)
    whine = 0
    for hz, db in WHINE:
        whine = whine + amp(db + wash - wash.max() + 2.7 * wobble(14)) * np.sin(2 * np.pi * hz * TIME)
    throb = np.sqrt(2) * amp(1.5 * wobble(14)) * gliding(THROB)
    return air + low + gliding(HUM) + throb + whine


def camera():
    """A faint mechanism ticks 120 times a second, strongest where a second clock of 72 a second agrees."""
    s = np.arange(0, N / SR - .01, 1 / 120)
    db = 8 * np.cos(2 * np.pi * 72 * s) + rng.normal(0, 2, len(s))
    ticks = unit(bursts(s, db, .006, blow=3))
    return amp(curves(KITCHEN)[-1]) * twice(ticks, [(4140, 610, -1), (5100, 590, -0.5)], steep_hz=8000)


def swells(rows):
    """Gain of sounds that climb to a peak and die away, each at its own speed."""
    power = 0
    for s, db, rise, fall in rows:
        below_db = 10 * np.maximum((s - TIME) / rise, (TIME - s) / fall)
        power = power + amp(db - below_db) ** 2
    return np.sqrt(power)


# foot dragged on stone: (peak time [s], level [dB], 10 dB rise [s], 10 dB fall [s])
SCUFF = [(3.557, -56.5, 0.0067, 0.023), (3.62, -56.5, .03, 0.015), (4.2, -54.5, 0.034, 0.067),
         (4.29, -60, .04, 0.028), (4.345, -59.5, 0.054, 0.023), (5.088, -49.5, 0.066, 0.018)]
# seeds sliding out, before layer offsets: (peak time [s], level [dB], 10 dB rise [s], 10 dB fall [s])
SHAKES = [(5.092, -60.5, 0.0036, 0.053), (5.4, -61, 0.018, 0.034), (5.96, -63.5, 0.0215, .08),
          (6.02, -61, .015, 0.051), (6.408, -64, .006, .08), (7.1, -68.5, 0.057, .06)]
# colour of the sliding seeds: (frequency [Hz], relative density [dB per Hz])
SEEDS = [(2500, -25), (3200, 13), (4500, 11), (7500, -5), (10000, -1.5), (13000, 1), (15500, -6),
         (16500, -27.5)]
# resonances of the mortar's rim: (center [Hz], width [Hz], relative level [dB])
RIM = [(291, 140, -11.5), (512, 45, -4), (692, 130, -1), (900, 103, 7.5), (1225, 250, 4), (1630, 220, 1.5),
       (1957, 303, 2.5), (2660, 370, -2)]


def handling():
    """The mortar's foot scuffs the counter; seeds slide over the rim and wake the glaze."""
    scuff = swells(SCUFF) * resonant(grains(2000, spread_db=1.5, smooth=1), RIM, steep_hz=2400)
    seeds = np.array([grains(1500, spread_db=2.5, smooth=.7) for _ in "LR"])
    chime = resonant(seeds, [(3180, 60, -3.0), (7230, 80, -8.0)], steep_hz=9040)
    return scuff + swells(SHAKES) * (amp(4.5) * coloured(seeds, SEEDS) + amp(-1) * chime)


# blows on the rim, before layer offsets: (time [s], knock [dB], ring [dB], ring [Hz], lasting ring [dB], click [dB],
# wood against the knock [dB], ring left-right [dB], high ring [dB])
TAPS = [(3.637, -5, -23, 3205, -41, -32.5, -21, 0, -51),
        (3.792, -2.5, -23, 3220, -43, -26, -24.5, -0.5, -52),
        (3.94, -4, -32, 3200, -45, -42, -22.5, 1, -76), (4.078, -6, -37, 3208, -54.5, -54.5, -22.5, 3, -71),
        (7.012, -14, -11.5, 3197, -39, -48, -55.5, 5.5, -75),
        (7.066, -34, -56, 3197, -67, -71, -23, -5, -95), (7.072, -25.5, -54, 3197, -68, -71, -37, -3, -95),
        (7.084, -14.5, -62, 3180, -72, -73, -43, 0, -95), (7.088, -21.5, -58, 3197, -68, -67, -18, 0, -92),
        (7.098, -17, -51, 3100, -63, -74, -35, -3, -86),
        (7.149, -37, -48, 3197, -60, -70, -35, -2.5, -90.5)]
# rings of the ceramic and its body: (frequency [Hz], relative level [dB], t60 [s])
LASTING_RING = [(3219, 0, .55), (3189, -3, .35), (3246, -7, .3), (3425, -18, .28)]
HIGH_RING = [(7456, 0, .2), (7425, -7, .12)]
BODY_RING = [(150, -9.5, .15), (210, 0, 0.18), (343.3, -9, .18), (477, -3, .09), (650, -4.5, 0.22),
             (748, -12.5, 0.22), (885, 3.5, 0.11), (1005, -5.5, 0.12), (1150, -4, 0.18), (1345, -8.5, 0.26),
             (1600, -5, 0.29), (1815, -7, .15), (1990, -10, 0.14), (2538, -18, .2)]
# the rim at the two microphones: (frequency [Hz], left-right [dB])
TAP_PAN = [(60, 1), (180, 1), (550, -2), (1650, 1), (4970, -2.5), (15000, -5)]
# (frequency [Hz], left leads by [rad])
TAP_LEAD = [(200, 0.04), (1000, 0.15), (4000, -0.5), (9000, -1.4)]
TAP_EDGE_PER_WOOD, TAP_EDGE_DB = -0.64, -38  # blows with little wood are the brightest
BODY_RING_DB, RING_T60_S = -30.5, .055
RING_STEP_S, RING_STEP_DB = 7.066, 0.5  # a slight rise of the lasting ring


def taps():
    """Wood on the rim: a dull knock with a click at its onset, and the ceramic's fluttering ring."""
    s, db, ring_db, ring_hz, lasting_db, click_db, wood_db, pan, high_db = np.transpose(TAPS)
    knock = resonant(bursts(s, db - 14.5, 0.059, blow=27.5), RIM, steep_hz=4030)
    knock += resonant(bursts(s, db + wood_db - 4.5, 0.12, blow=8.9), WOOD, steep_hz=909)
    edge_db = db + TAP_EDGE_PER_WOOD * wood_db + TAP_EDGE_DB
    knock += resonant(bursts(s, edge_db, 0.027, blow=3.1), EDGE + GLAZE, steep_hz=6000)
    click_colour = [(3000, -25.0), (4500, -1.0), (5800, 3.5), (7500, 7.5), (10000, -17.5), (16000, -26)]  # Hz, dB
    click = coloured(bursts(s, click_db, 0.0044, blow=8.1), click_colour)
    lasting = ringing(s, lasting_db, pan, LASTING_RING, flutter_db=2.5, drift=.6)
    lasting *= 0.87 + 0.45 * wobble(90)
    lasting *= amp(RING_STEP_DB * (TIME > RING_STEP_S))
    high = ringing(s, high_db, 0 * pan, HIGH_RING) * amp(3.4 * wobble(40))
    knock, click = ports(knock, TAP_PAN, TAP_LEAD), ports(click, TAP_PAN, TAP_LEAD)
    knock = knock + ringing(s, db + BODY_RING_DB, 0 * pan, BODY_RING, flutter_db=4.5, drift=1.6)
    ring = 0
    for at, level, side, hz in zip(s, ring_db, pan, ring_hz):
        ring = ring + ringing([at], [level + 6.0], [side], [(hz, 0, RING_T60_S)], scatter_db=0.1)
    return knock + ring + lasting, click + high


# decay of the kitchen's answer: (frequency [Hz], t60 [s])
ROOM = [(150, 0.67), (1000, 0.34), (4000, 0.22), (10000, 0.29)]
# part of the tail that only one microphone hears: (frequency [Hz], share)
ROOM_APART = [(100, .12), (400, .3), (2000, .45), (8000, 0.57)]


def room(x):
    """Each frequency of the room's answer dies at its own speed; every stretch of sound gets a new tail."""
    out, step = np.zeros((2, N + 2 * SR)), SR // 7
    for start in range(0, N, step):
        hz, t, z = signal.stft(rng.standard_normal((2, SR // 2)), SR, nperseg=256)
        apart = np.clip(along(ROOM_APART, hz), 0, 1)[:, None]
        z[1] = np.sqrt(1 - apart ** 2) * z[0] + apart * z[1]  # close microphones hear nearly the same tail
        fade = amp(-60 * t / along(ROOM, hz)[:, None])
        tail = signal.istft(z * fade, SR, nperseg=256)[1]
        tail = tail / np.linalg.norm(tail, axis=1)[:, None]
        wet = signal.fftconvolve(x[None, start:start + step], tail, axes=1)
        late = start + 200  # samples
        out[:, late:late + wet.shape[1]] += wet
    return out[:, :N]


def scene():
    """Near sounds at the counter, their answer from the room, the kitchen and the camera."""
    grind, (blows, clicks) = grinding(), taps()
    near = ports(grind, GRIND_PAN, GRIND_LEAD) + blows + clicks + handling()
    to_room = amp(-16.0) * grind.mean(axis=0) + amp(-14) * blows.mean(axis=0)
    return near + room(to_room) + kitchen() + camera()


TOP_HZ = 16700


def record(dry):
    """The camera keeps nothing above its band limit."""
    m = next_fast_len(N + SR // 2)
    kept = np.fft.rfftfreq(m, 1 / SR) < TOP_HZ
    return irfft(rfft(dry, m) * kept, m)[:, :N]


dry = scene()
out = record(dry)
output_pcm(out)
```